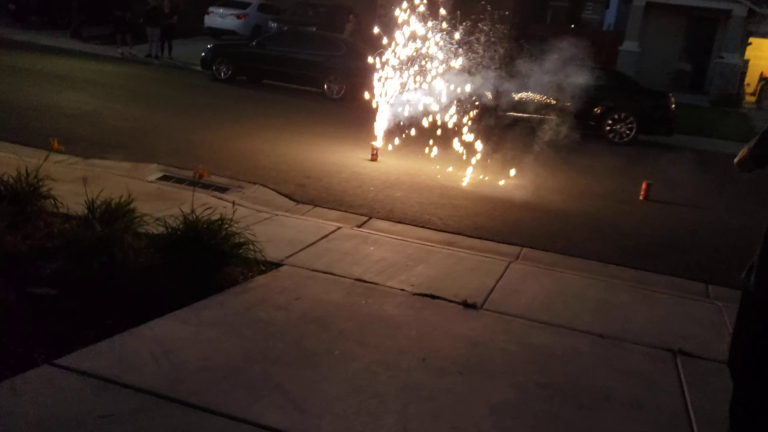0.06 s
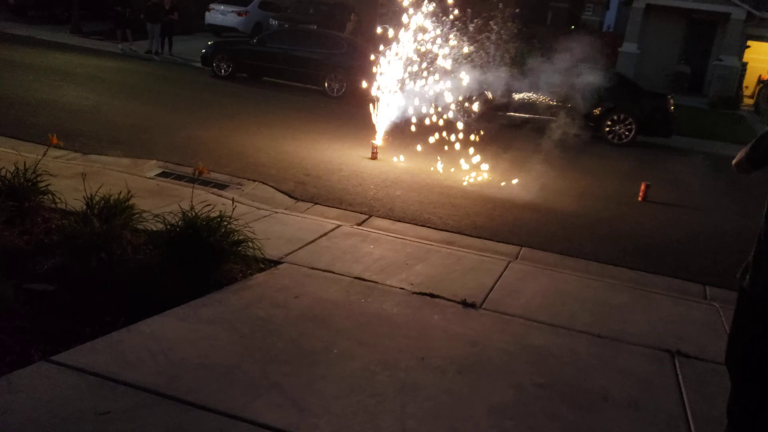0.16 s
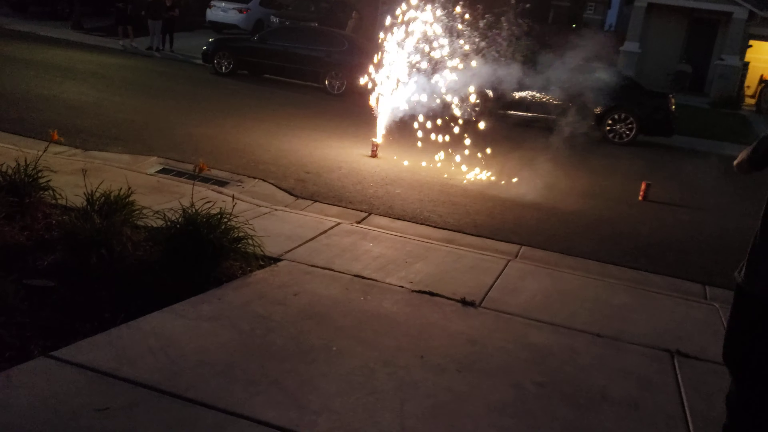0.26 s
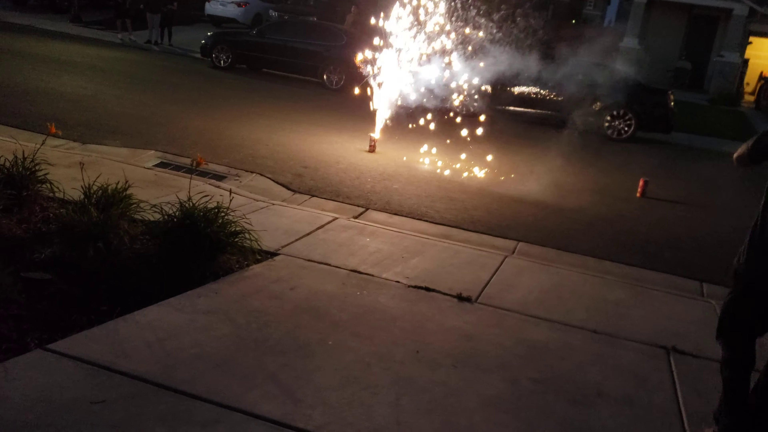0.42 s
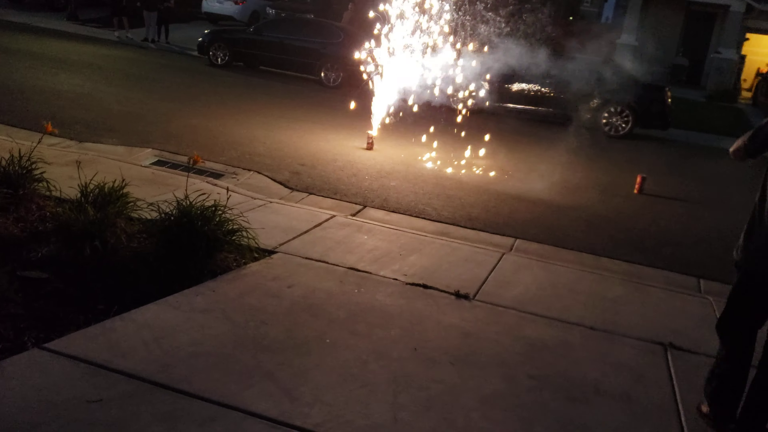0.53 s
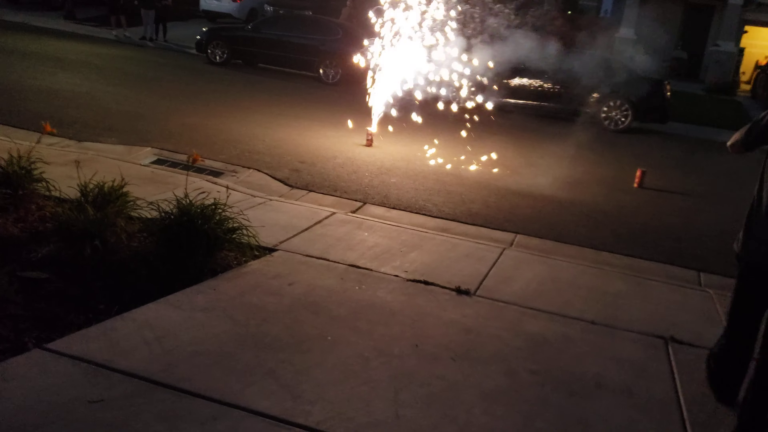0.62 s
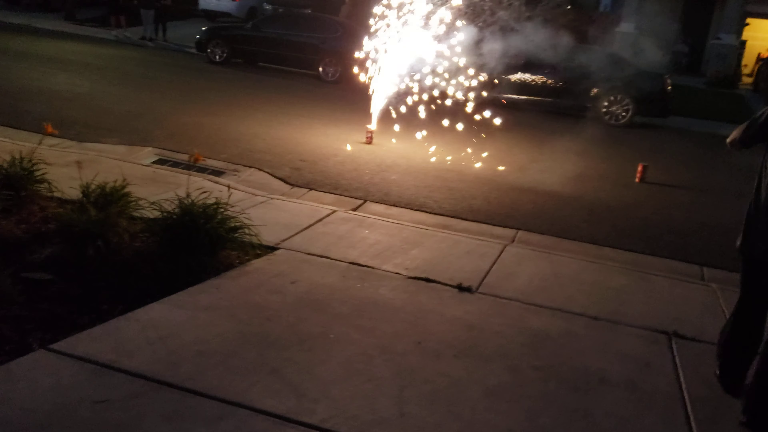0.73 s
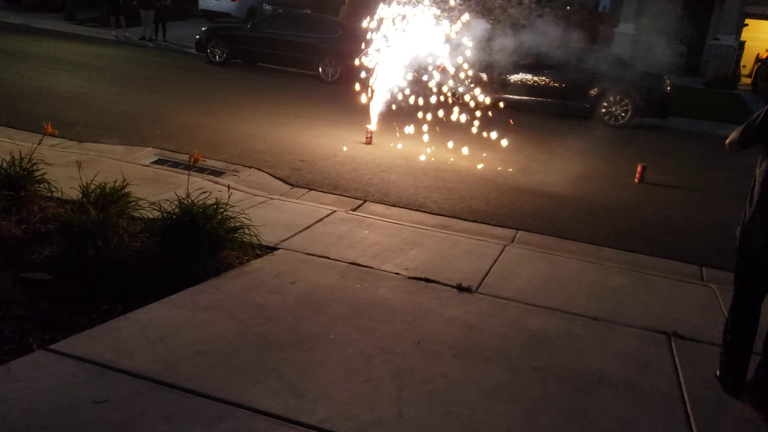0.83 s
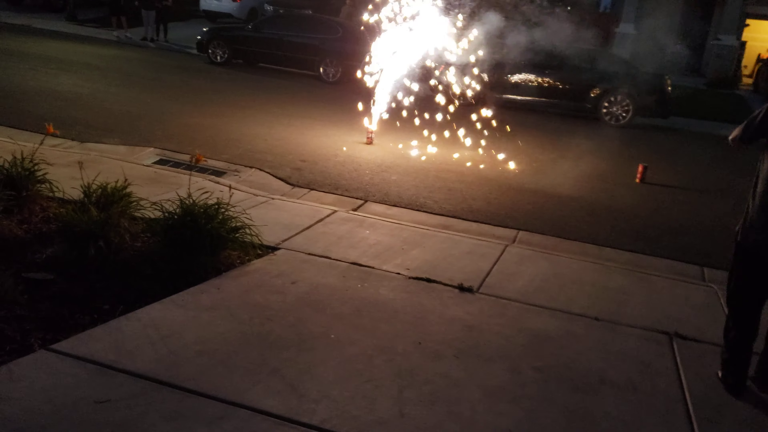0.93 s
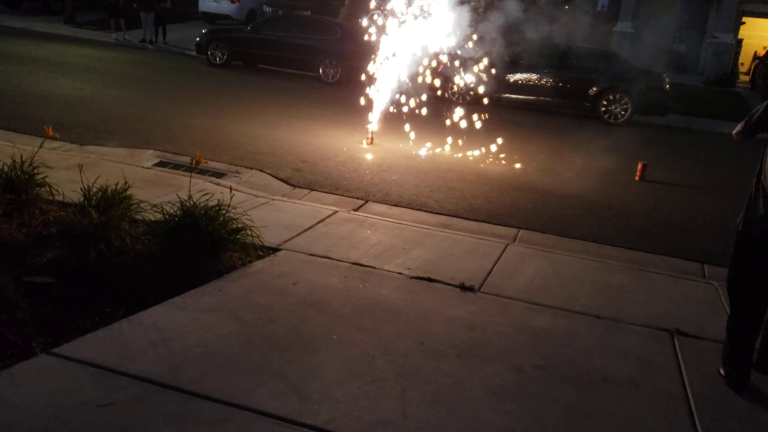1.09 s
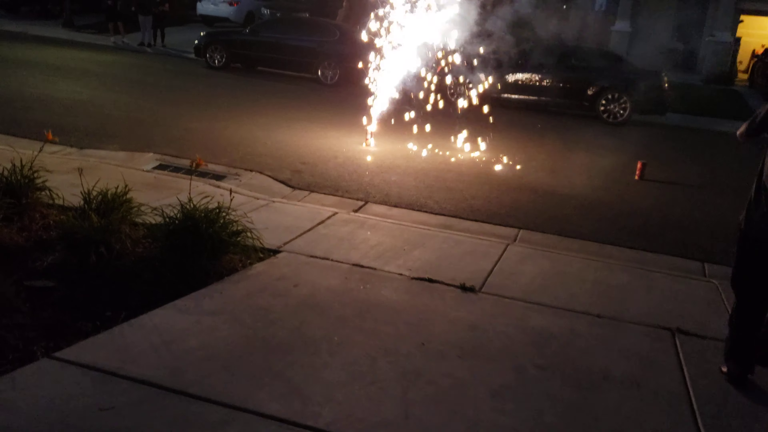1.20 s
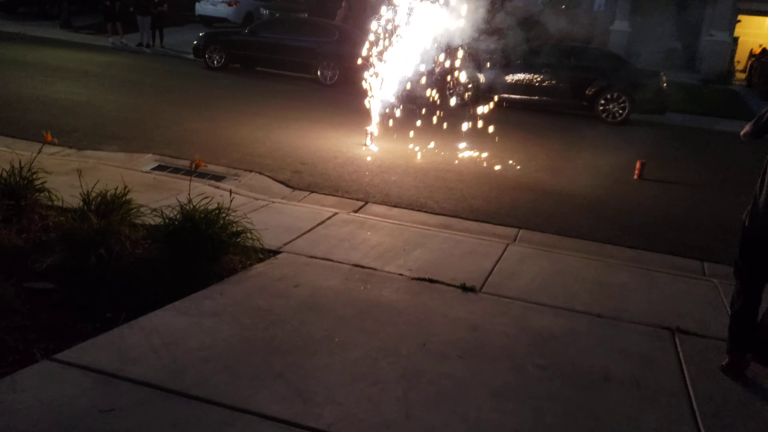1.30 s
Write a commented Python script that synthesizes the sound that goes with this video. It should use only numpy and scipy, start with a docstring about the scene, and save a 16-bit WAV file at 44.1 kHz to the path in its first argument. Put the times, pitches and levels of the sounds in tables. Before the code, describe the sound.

A fountain firework gives a shrill, buzzy, falling whistle over hissing sparks on a street.

```python
"""Whistling firework fountain

A fountain's jet hisses and spits sparks on a street, a few metres from a phone, over a distant engine.
A whistle charge lights: pulsed burning makes a shrill, buzzy tone that sinks in pitch as the tube burns
longer and thins out at the end, thrown back by cars and house fronts. The hiss and street rumble sink
in level while it sounds, and one dull pop goes off further away."""
import sys
import numpy as np
from scipy import signal
from scipy.fft import rfft, irfft
from scipy.io import wavfile
from scipy.ndimage import uniform_filter1d, map_coordinates

SR = 44100
rng = np.random.default_rng(int(sys.argv[2]) if len(sys.argv) > 2 else 0)


def persist_wave(psi):
    """Save psi, clipped to +-1, as 16-bit WAV."""
    counts = np.round(np.clip(psi, -1, 1) * 32767).astype(np.int16)
    wavfile.write(sys.argv[1], SR, np.atleast_2d(counts).T)


N = 59535


def undb(db):
    return 10 ** (np.asarray(db) / 20)


def unit(x):
    return x / np.sqrt(np.mean(x ** 2))


def band(x, hz, width_hz, order=1):
    """Band-pass around a centre."""
    low = np.sqrt(hz ** 2 + width_hz ** 2 / 4) - width_hz / 2
    edges = [low, min(low + width_hz, SR / 2.1)]
    return signal.sosfilt(signal.butter(order, edges, "band", fs=SR, output="sos"), x)


def wander(rate_hz):
    """Smoothed random sample-and-hold modulator, RMS 1."""
    hold = int(SR / rate_hz)
    held = rng.standard_normal(N)[np.arange(N) // hold]
    return unit(uniform_filter1d(uniform_filter1d(held, hold), hold))


def curve(rows, column=1):
    """A table column drawn across the spectrum on a log-frequency axis."""
    rows = np.array(rows)
    return np.interp(np.log(np.fft.rfftfreq(N, 1 / SR) + 1), np.log(rows[:, 0]), rows[:, column])


def street_reverb(x, t60_s):
    """The street scatters a sound into a diffuse tail, unrelated left and right."""
    t = np.arange(SR) / SR
    tail = rng.standard_normal((2, SR)) * undb(-60 * t / t60_s) * np.clip(t / 0.0098, 0, 1)
    return signal.fftconvolve(x[None], tail / np.sqrt(np.sum(tail ** 2) / 2), axes=1)[:, :N]


def engine_drone():
    """A distant engine hums: a narrow band of low noise."""
    return undb(-26.5) * unit(band(rng.standard_normal(N), hz=65.4, width_hz=22))


def sparks(per_s=900):
    """Sparks spit as single clicks of random polarity and slightly uneven strength."""
    chance, polarity, strength = rng.random((3, N))
    return unit((chance < per_s / SR) * np.sign(polarity - .5) * undb(-np.log(strength + .02)))


# EQ of the jet and street rumble together: freq_hz, gain_db
HISS_EQ = [(18, -57), (30, -16), (64, -6), (194, -12), (259, -12), (394, -6.5), (473, -13), (512, -14),
           (632, -15), (962, -8), (1460, -13.5), (1720, -20.5), (2480, -5.5), (3670, -6), (3980, -13.5),
           (4420, -4.5), (5900, -17), (7090, -7), (8520, -19.5), (11700, -10), (16000, -12.5)]
# Stereo image of the hiss, 0 wide to 1 mono: freq_hz, correlation
HISS_IMAGE = [(60, 0.35), (300, 1), (700, 0.43), (1500, 0.29), (4000, 0.39), (12000, 0)]
# Fader moves of the bed: time_s, level_db, treble_tilt_db_per_octave, drone_offset_db
BED_FADERS = [(0, -31, -1.5, 11.5), (0.191, -30, -2.5, 11.5), (0.221, -36.5, 3, 3), (.3, -38, 2, 10.5),
              (.5, -40, 4, 2), (.8, -40.5, 3, 10.5), (1.049, -44, 3.5, 4), (1.12, -44, -3.5, -2),
              (1.35, -45.5, -4, 13)]


def hiss_bed(t):
    """Jet noise and sparks in half-octave bands that swell together and flicker alone, over the drone."""
    colour = undb(curve(HISS_EQ))
    correlation = np.clip(curve(HISS_IMAGE), 0, 1)
    jet = undb(-4.96) * sparks() + rng.standard_normal(N)
    mid = rfft(jet) * colour * np.sqrt(1 + correlation)
    side = rfft(rng.standard_normal(N)) * colour * np.sqrt(1 - correlation)
    stereo = np.array([mid + side, mid - side])
    rms = np.sqrt(np.mean(irfft(stereo[0], N) ** 2))
    time_s, level_db, tilt, drone_db = np.array(BED_FADERS).T
    bin_octave = np.log2(np.fft.rfftfreq(N, 1 / SR) + 1)
    swell_db = .7 * wander(5.16)
    hiss = 0
    for octave in np.arange(4, 14.5, .5):
        window = np.clip(1 - 2 * np.abs(bin_octave - octave), 0, 1)
        treble_db = np.clip(octave - 11.5, 0, 1.5) * np.interp(t, time_s, tilt)  # tilts from 2.9 to 8 kHz
        flicker_db = 1.3 * wander(12.5)
        gain = undb(np.interp(t, time_s, level_db) + treble_db + swell_db + flicker_db)
        hiss = hiss + gain * irfft(window * stereo, N)
    return hiss / rms + engine_drone() * undb(np.interp(t, time_s, level_db + drone_db))


# Cue for the far pop: start_s, level_db, pitch_hz
POP_CUES = [(.6765, -23.5, 856)]


def distant_pop(t, t60_s=0.0047):
    """A short dull knock and its rumble along the street."""
    knock = 0
    for start_s, level_db, pitch_hz in POP_CUES:
        age = t - start_s
        envelope = (age > 0) * undb(level_db - 60 * np.clip(age, 0, 1) / t60_s)
        knock = knock + envelope * np.sin(2 * np.pi * pitch_hz * age)
    return knock + undb(6.5) * street_reverb(knock, t60_s=0.23)


# Early reflections: left_delay_s, right_delay_s, level_db, lowpass_hz
REFLECTIONS = [(.0008, 0.00062, -26.5, 11900), (.0056, .0052, -22.5, 9200), (.0093, .0098, -13, 9000),
               (.0182, 0.013, -10, 9000), (.033, 0.04, -11.5, 9100)]


def echoes(x):
    """Cars and house fronts throw the sound back, late and a little duller."""
    out = 0
    for left_s, right_s, level_db, lowpass_hz in REFLECTIONS:
        dull = signal.sosfilt(signal.butter(1, lowpass_hz, fs=SR, output="sos"), x)
        taps = [map_coordinates(dull, [np.arange(N) - s * SR], order=3) for s in (left_s, right_s)]
        out = out + undb(level_db) * np.array(taps)
    return out


# EQ and panning at the phone's two ports: freq_hz, left_lead_rad, left_over_right_db, gain_db
PORT_RESPONSE = [(2300, -0.5, 4, -6.5), (2500, 0, -3, 0.5), (3140, 1.3, 1, 1.5), (4327, -2, 9, -1),
                 (4610, -2.5, 7, -1.5), (4910, -2.5, 2, 6), (5487, 0.05, 0.5, -3.5), (5690, 2.6, 5, -4.5),
                 (5766, 1.45, 2, 1.5), (7280, -0.9, 6.5, 5), (7860, -0.9, 5, 3), (8960, 2.53, -9, -4.5),
                 (9410, 0.4, -1.5, -1.5), (10750, 2, -2.5, 2.5), (11390, 2.5, 3.5, -0.5),
                 (11980, 1.43, 0, 5), (13270, 0.77, 2, -6.5), (15100, 1.9, 6, -1), (15960, 0.2, 7, -12.5)]


def phone_body(x):
    """The phone's body colours the direct sound and shifts its phase and level between the ports."""
    pan = undb(curve(PORT_RESPONSE, column=2) / 2) * np.exp(.5j * curve(PORT_RESPONSE, column=1))
    colour = undb(curve(PORT_RESPONSE, column=3))
    return irfft(rfft(x) * colour * np.array([pan, 1 / pan]), N)


# EQ of the whistle's breath: freq_hz, gain_db
GAS_EQ = [(1500, -30), (3000, -35), (5000, -10), (6500, -46), (8500, -46), (11000, -16), (14000, -2),
          (16000, -10)]


def gas_rush():
    """Burning gas rushes out of the tube as bright noise."""
    return irfft(rfft(rng.standard_normal(N)) * undb(curve(GAS_EQ)), N)


# The whistle's falling glide: time_s, pitch_hz, level_db, odd_harmonics_db
WHISTLE_GLIDE = [(0.196, 2934, -53.5, -16), (.203, 2895, -23, -34), (0.2096, 2880, -19.5, -1),
                 (0.2075, 3165, -15.5, -8.5), (0.216, 3110, -15, -5), (0.218, 3050, -18, 4.5),
                 (.244, 2960, -17, 3.5), (0.246, 2960, -32, 19.5), (.2505, 3076, -14, 2),
                 (0.255, 2940, -26, 13.5), (0.271, 2900, -18, 3), (.33, 2781, -15.5, 0),
                 (0.398, 2692, -17, -3), (0.445, 2650, -16.5, 0), (0.4455, 2543, -32, 10),
                 (0.449, 2651, -20.5, 5.5), (0.499, 2606, -18.5, 3), (.58, 2559, -22, 4.5),
                 (0.699, 2458, -22, 0), (0.812, 2378, -19.5, 1.5), (0.909, 2295, -19.5, 5),
                 (0.956, 2300, -25, 12.5), (0.974, 2204, -19.5, -7.5), (.98, 2250, -21.5, -19),
                 (1.0, 2225, -29, -21), (1.04, 2247, -26, -14), (1.078, 2203, -31, -24),
                 (1.08, 2270, -29.5, -18), (1.094, 2250, -31, -8), (1.101, 2240, -54.5, -34),
                 (1.11, 2238, -75, -19)]
# Balance of harmonics 1-7 from the moment it lights: gain_db, slope_db_per_s
WHISTLE_HARMONICS = [(-8.5, -17.5), (1.5, -0.5), (-13, -5.5), (-3, -12), (-3.5, -4.5), (7.5, -8), (-3, 6)]


def whistle(t):
    """Pulsed burning in the tube: a wobbling stack of harmonics, each fluttering, in rushing gas."""
    time_s, pitch_hz, level_db, odd_db = np.array(WHISTLE_GLIDE).T
    age = t - time_s[0]
    pitch_hz, odd_db = np.interp(t, time_s, pitch_hz), np.interp(t, time_s, odd_db)
    wobble_hz, rasp_hz = 8.5 * wander(240), 9 * wander(700)
    phase = 2 * np.pi * np.cumsum(pitch_hz + wobble_hz + rasp_hz) / SR
    shared_flutter = wander(130)
    tone = 0
    for n, (gain_db, slope) in enumerate(WHISTLE_HARMONICS, start=1):
        depth = 0.2 if n == 1 else 1  # the fundamental is steadier
        flutter_db = depth * (1.116 * shared_flutter + 1.271 * wander(130))
        gain = undb(gain_db + slope * age + (n % 2) * odd_db + flutter_db)
        alias_free = n * pitch_hz < SR / 2.3
        tone = tone + gain * np.sin(n * phase) * alias_free
    # Strong and weak pulses alternate by fits: faint lines between the harmonics.
    unevenness = undb(-22 - 14 * age) * wander(500)
    tone = tone * (1 + unevenness * np.cos(phase / 2))
    gas = gas_rush() * undb(0.92 * shared_flutter + 0.23 * odd_db)
    surge_db = .8 * wander(18)  # slower swells of the burn
    return (tone + gas) * undb(np.interp(t, time_s, level_db, left=-200, right=-200) + surge_db)


def scene():
    """The whistle up front with its echoes and bright tail, over the hiss and the pop."""
    t = np.arange(N) / SR
    shriek = whistle(t)
    reverb_send = undb(-7) * band(shriek, hz=4710, width_hz=3340, order=2)
    tail = street_reverb(reverb_send, t60_s=0.61)
    return hiss_bed(t) + distant_pop(t) + tail + echoes(shriek) + phone_body(shriek)


def record(dry, cutoff_hz=15750):
    """The phone cuts the top with a steep low-pass."""
    return signal.sosfilt(signal.ellip(12, .2, 88, cutoff_hz, fs=SR, output="sos"), dry)


dry = scene()
out = record(dry)
persist_wave(out)
```